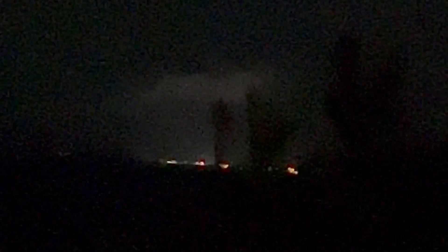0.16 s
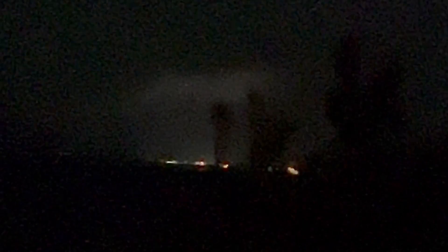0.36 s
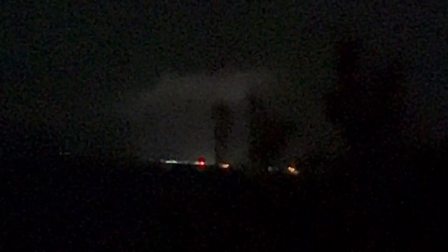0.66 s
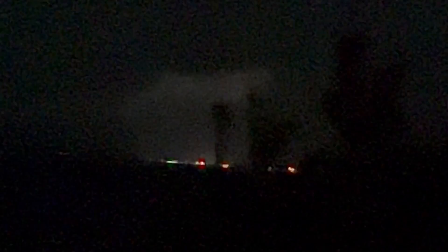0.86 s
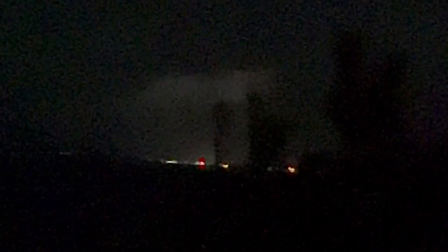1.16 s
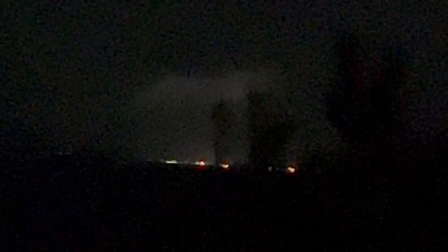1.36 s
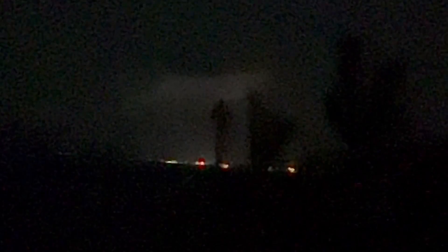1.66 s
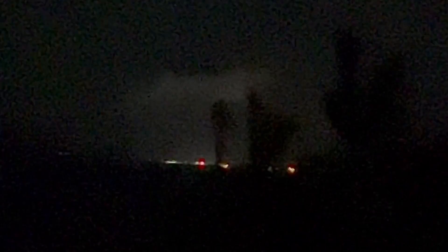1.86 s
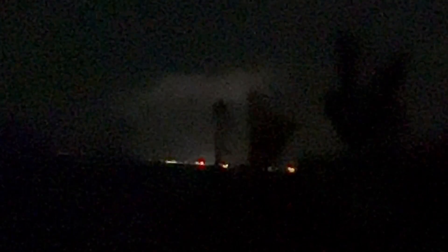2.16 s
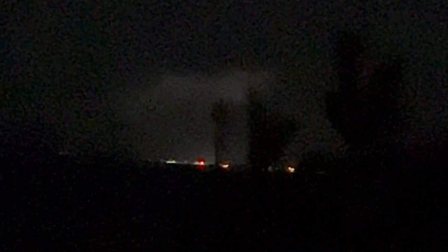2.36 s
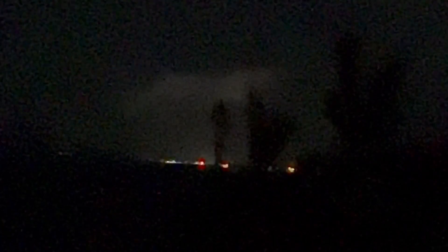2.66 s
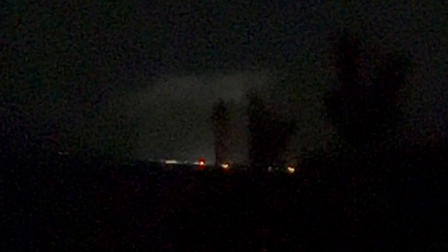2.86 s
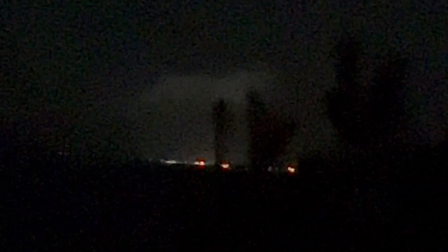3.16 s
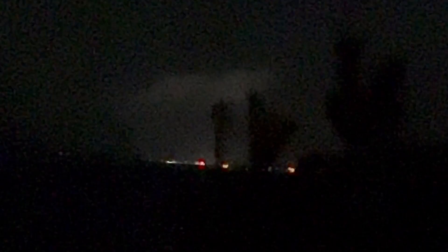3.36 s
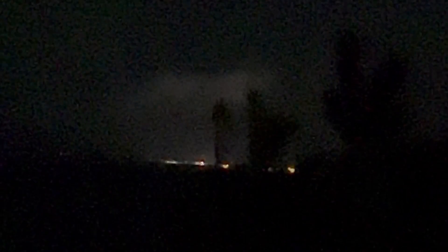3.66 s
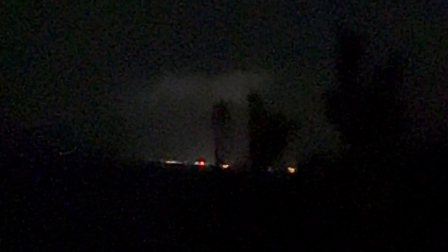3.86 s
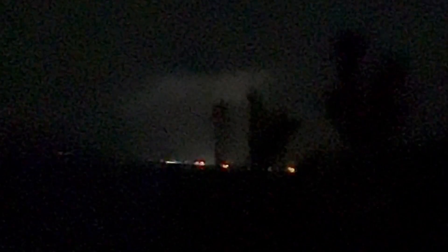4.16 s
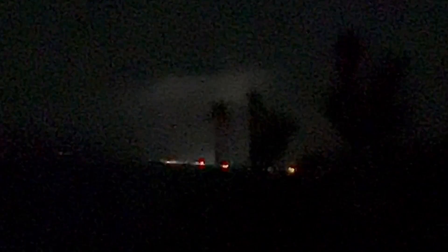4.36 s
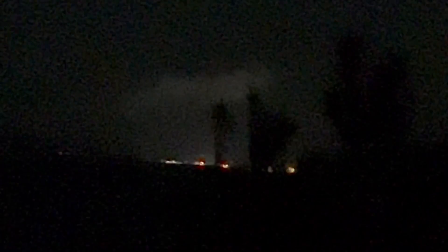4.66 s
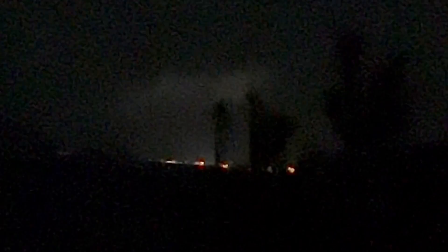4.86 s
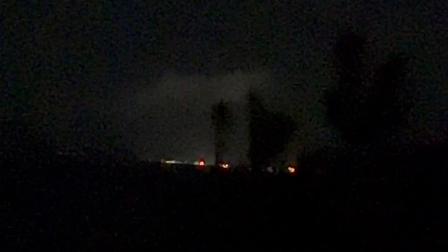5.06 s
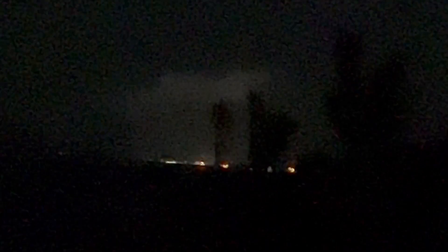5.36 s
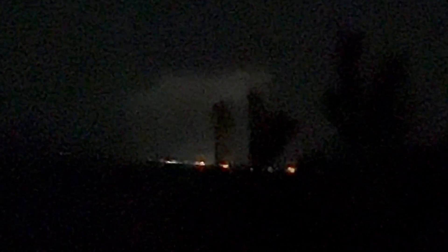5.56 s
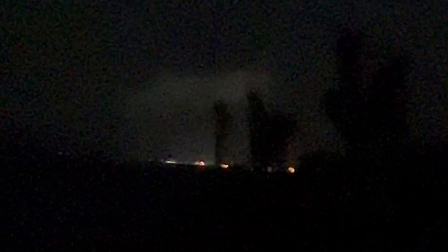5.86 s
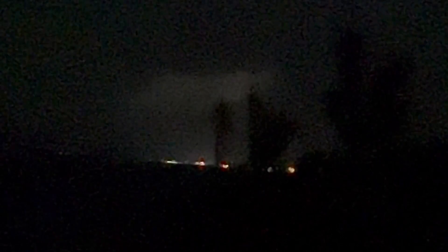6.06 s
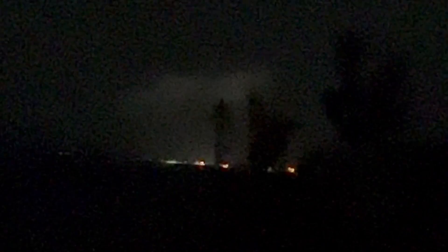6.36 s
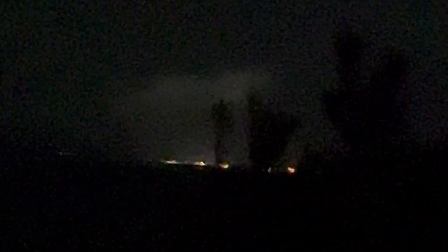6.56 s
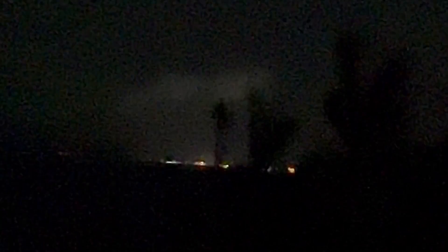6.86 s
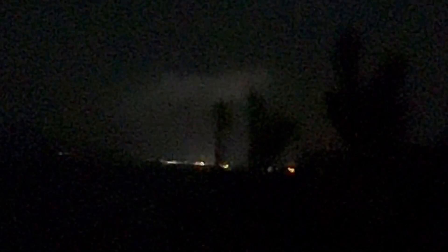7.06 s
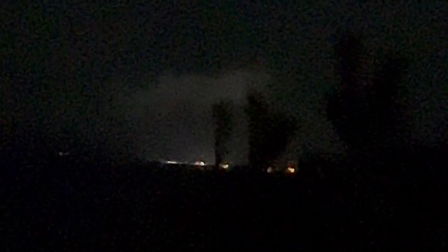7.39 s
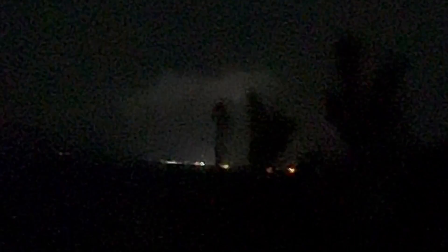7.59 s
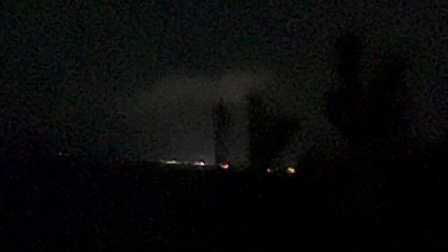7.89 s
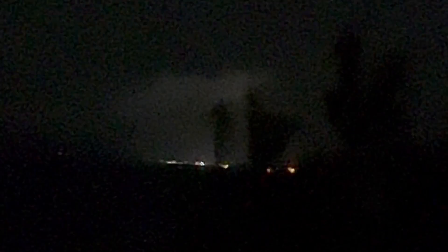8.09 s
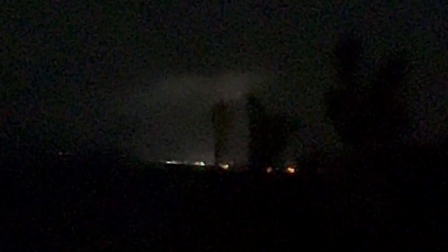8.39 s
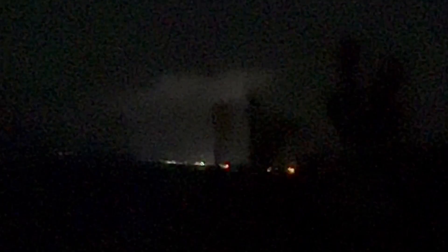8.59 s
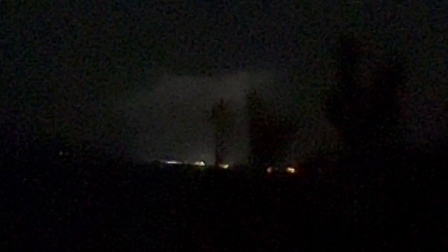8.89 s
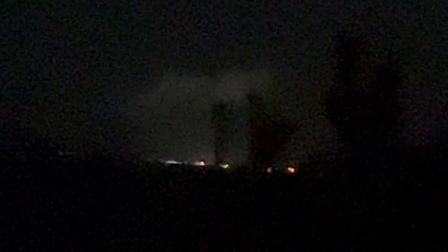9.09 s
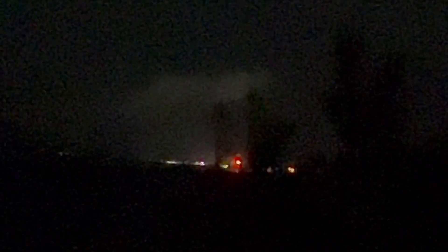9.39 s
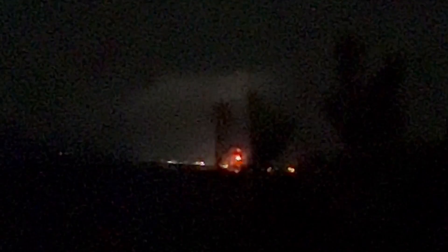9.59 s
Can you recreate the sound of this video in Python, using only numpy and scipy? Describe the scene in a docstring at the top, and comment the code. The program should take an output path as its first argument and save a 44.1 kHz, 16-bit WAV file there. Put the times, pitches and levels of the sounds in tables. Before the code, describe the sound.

A dense cricket chorus shimmers over a dark field while distant fireworks thump softly, one louder blast rolling across the plain late on.

```python
"""A field at night. From the start a cricket chorus near 5.5 kHz, built of short swelling tones, sings over low
far-traffic noise and soft night air; distant fireworks, low pushes with echoes and noise tails, thump early on.
Chirps, sinking trills and a faint high triller stand out as single singers, and a bush cricket ticks in noise.
After some 5.6 s its ticks give way to a buzz, the loudest blast rolls over the plain near 6.9 s,
the buzz stays on only faintly from about 7.6 s, and small thumps follow under the chorus until the end."""
import sys
import numpy as np
from scipy import signal
from scipy.fft import rfft, irfft, next_fast_len
from scipy.io import wavfile
from scipy.ndimage import uniform_filter1d, map_coordinates

SR = 44100
rng = np.random.default_rng(int(sys.argv[2]) if len(sys.argv) > 2 else 0)


def int16_out(signal):
    """Quantize to a 16-bit WAV file."""
    q = np.round(np.clip(np.atleast_2d(signal).T, -1, 1) * 32767)
    wavfile.write(sys.argv[1], SR, q.astype(np.int16))


N = 429093

# Tone colour of far traffic and night air: f/Hz, relative level/dB
AIR_COLOUR = [(18, -12), (32, -29), (48, 2.5), (60, 4), (72, -9), (86, 4), (105, -11.5), (363, -8.5),
              (496, -12), (573, -9), (1550, -19.5), (1910, -20), (2720, -26), (3300, -25), (4200, -26),
              (6400, -19.5), (7200, -32), (8100, -42), (9800, -30), (11300, -34), (12300, -39.5),
              (15800, -53)]
# Loudness of that air over time: t/s, level/dB
AIR_LEVEL = [(0.0, -48.5), (0.51, -49.5), (0.73, -50.5), (2.65, -49.5), (2.85, -50.5), (3.6, -51),
             (4.79, -49), (5.2, -50.5), (6.07, -50), (6.34, -49.5), (7.59, -51), (8.02, -50), (9.73, -50.5)]
# How alike the air is at the two microphone ports: f/Hz, correlation (1 = same)
PORT_LIKENESS = [(60, 1), (300, 0.95), (500, 0.7), (1100, 0.52), (1650, 0.11), (1950, 1), (3900, 0.19),
                 (4500, 0.99), (6200, 1), (6900, 0.3), (7500, 0.29), (9200, 0.87), (9800, 1), (13200, 1),
                 (15800, 1)]

# Firework blasts: t/s, level/dB, brightness f/Hz, rolling tail level/dB against the push
BLASTS = [(0.028, -37.5, 120, -6), (0.139, -36.5, 100, -15), (.345, -40.5, 102, -3),
          (0.528, -39.5, 70, -11), (0.7, -42, 99, -9), (6.888, -18.5, 230, -7.5), (7.275, -45.5, 139, 4),
          (7.987, -41, 90, -5), (8.598, -42, 70, -2), (8.777, -43, 101, -15.5), (9.437, -37.5, 110, -25)]
# Resonances that air and ground leave of a blast: f/Hz, width/Hz, level/dB
BLAST_RESONANCES = [(70.5, 45, 9.5), (126, 60, -3), (237, 120, 0.5), (407, 117, 6)]
# Echoes of the push: delay/s, level/dB
BLAST_ECHOES = [(0.036, -4), (0.083, -9), (0.122, -12), (.16, -17), (.213, -20), (.27, -16.5), (.32, -21)]
# Time the rolling noise takes to fall by 60 dB: f/Hz, t60/s
ROLL_DECAY = [(50, 0.82), (110, 0.93), (280, 0.64), (600, 0.47)]
ECHO_HZ, RUMBLE_LEAD_S = 260, .011  # echoes are duller; the rumble starts just before the push

# Level of the rasping noise, with faint brief flickers late on: t/s, level/dB
RASP_LEVEL = [(0, -72), (5.56, -69), (5.59, -56.5), (7.57, -58), (7.63, -68), (7.85, -85), (8.72, -66),
              (8.95, -77), (9.58, -75), (9.63, -62), (9.68, -80)]
# Tone colour of the rasp: f/Hz, relative level/dB
RASP_COLOUR = [(11500, -54), (12600, -11), (13300, -6), (14100, 2), (14700, -1), (15200, -1), (15800, -0.5)]
# Brief dips in the level of the high noise: t/s, length/s
BUZZ_DIPS = [(5.755, .05), (5.818, .05), (6.135, .05), (6.535, .04), (6.855, .03), (6.935, .035),
             (7.235, .14)]
DIP_DB = -12  # depth of a dip
TICK_START_S, TICK_GAP_S, TICK_COUNT = .055, .07597, 77
TICK_HURRY = .158  # the gap shrinks by this share, mostly late
TICK_RUSH_S, TICK_RUSH_POWER = .02, 40  # the last few ticks come early, by this much at most
TICK_RISE_S, TICK_STOP_S = .022, .008  # a tick swells, then stops short

# Three-stroke chirps of the 6 kHz cricket: t/s, level/dB, how far ahead its faint lead-in stroke comes/s
TRIPLE_CHIRPS = [(.094, -46, 0.057), (0.703, -44, 0.16), (2.058, -47, 0.11), (2.608, -48, .147),
                 (3.84, -47, .147), (4.301, -44, 0.058), (4.904, -46, 0.149), (6.214, -48, .147),
                 (6.765, -44, 0.17), (8.267, -47, 0.12), (8.843, -44, 0.13)]
# Strokes within such a chirp: offset/s, level/dB against the chirp, starting f/Hz
TRIPLE_STROKES = [(-.003, -.5, 6010), (.05, 1.5, 6035), (.103, 2, 6040)]
LEAD_IN_DB, LEAD_IN_HZ = -3, 5960  # level against the chirp; starting pitch
# Long falling strokes, given by their overtone: t/s, overtone level/dB
FALLING_STROKES = [(0.154, -62), (0.213, -62), (0.676, -60.5), (0.817, -60), (0.896, -62), (2.244, -60),
                   (2.388, -60.5), (2.865, -60), (3.021, -60), (4.425, -61), (4.57, -63), (5.01, -65),
                   (5.066, -58), (5.186, -66), (6.44, -60), (6.584, -58), (6.644, -64), (7.136, -59),
                   (7.283, -58.5), (8.519, -55), (8.652, -57), (9.188, -57.5), (9.332, -61)]
# Sinking trills of the lower crickets: t/s, length/s, start f/Hz, end f/Hz, level/dB, strokes/s
SINKING_TRILLS = [(-.05, .55, 4470, 4420, -58, 48.5), (.039, .52, 4610, 4510, -52, 48.5),
                  (.5, .35, 4540, 4500, -62, 48), (.805, .44, 4600, 4550, -52, 47.5),
                  (1.06, .62, 4450, 4415, -57, 47.5), (1.3, .35, 4810, 4740, -59, 53),
                  (2.515, .38, 4810, 4730, -57.5, 53), (3.48, .35, 4810, 4730, -58.5, 53),
                  (4.38, .38, 4810, 4730, -59, 53), (5.345, .38, 4810, 4730, -58.5, 53),
                  (6.33, .38, 4810, 4730, -59, 53), (8.284, .48, 4600, 4490, -52.5, 51),
                  (8.78, .4, 4510, 4500, -63, 51), (9.155, .52, 4600, 4500, -52, 50)]
TRILL_SWELL_S, TRILL_SWELL_DB, TRILL_SCOOP_HZ = .03, 10, 80  # a trill starts soft and flat
# The high triller's bouts: first stroke t/s, end t/s, strokes/s
HIGH_BOUTS = [(.0097, 1.72, 37.98), (1.8938, 9.73, 38.15)]

# Loudness of the farther chorus: t/s, level/dB
FAR_CHORUS_LEVEL = [(0, -39), (.95, -39), (1.1, -41), (1.75, -38), (2.45, -41.5), (3.2, -38), (4.7, -39.5),
                    (6, -39), (7.6, -39), (8.12, -40.5), (8.8, -39.5), (9.36, -39), (9.73, -38.5)]
# The far crowd's blurred spectrum: f/Hz, relative level/dB
CROWD_COLOUR = [(4300, -50), (4700, -31), (4880, -27), (5030, -17), (5250, -9), (5420, -5), (5510, -1.5),
                (5590, -6), (5700, -4), (5780, -18), (5900, -24), (6200, -68)]
# Chirps of the nearest crickets: first stroke t/s, stroke count, strokes/s, level/dB
NEAR_CHIRPS = [(0.024, 3, 39.0, -35.1), (0.232, 7, 39.25, -34.1), (0.434, 6, 36.5, -38.1),
               (0.764, 7, 40.5, -35.3), (1.884, 7, 39.75, -33.9), (2.246, 6, 39.75, -35.5),
               (2.538, 7, 39.0, -37.3), (2.881, 4, 40.25, -33.5), (3.014, 10, 38.5, -35.7),
               (3.444, 7, 38.75, -35.9), (3.729, 10, 39.5, -36.1), (4.188, 6, 38.75, -34.2),
               (4.452, 9, 37.5, -35.7), (4.799, 7, 39.5, -33.6), (5.083, 4, 40.75, -34.1),
               (5.352, 5, 41.0, -36.1), (5.588, 10, 39.0, -38.1), (5.927, 8, 39.5, -35.1),
               (6.222, 7, 39.5, -34.0), (6.548, 7, 39.5, -34.8), (6.836, 3, 37.5, -34.9),
               (7.156, 8, 38.5, -35.6), (7.464, 5, 39.75, -34.4), (7.595, 5, 39.5, -36.4),
               (7.823, 10, 38.5, -36.8), (8.22, 6, 38.75, -34.3), (8.612, 7, 37.5, -36.9),
               (8.813, 3, 36.5, -37.3), (8.994, 3, 36.5, -36.1), (9.203, 4, 37.5, -32.6),
               (9.446, 5, 37.75, -35.0)]
CHIRP_ENDS_DB, STROKE_SCATTER_DB = -0.5, 1.5  # end strokes against the middle; chance spread per stroke
# Sharp single strokes that stand out of the chorus: t/s (shortly before mid-stroke), level/dB
SHARP_STROKES = [(.205, -42), (0.313, -35), (0.761, -36), (0.79, -39), (1.254, -34), (1.57, -42),
                 (1.883, -34), (1.93, -33), (2.245, -32.5), (2.312, -28), (2.617, -34), (2.803, -32.5),
                 (3.088, -43), (3.847, -38), (4.502, -38), (4.541, -43), (4.636, -38), (4.797, -32),
                 (4.821, -34), (4.923, -36), (4.944, -31), (5.742, -34), (6.295, -32.5), (6.547, -32.5),
                 (6.568, -34), (6.601, -37), (6.831, -36), (7.155, -37), (7.205, -33), (7.286, -32),
                 (7.336, -36), (7.444, -42), (8.638, -35), (8.688, -39), (9.198, -34), (9.227, -30),
                 (9.28, -32)]
SHARP_S = .012  # length of such a stroke
CLEARING_S, CLEARING = .02, .9  # background level is lowered by this share so the stroke stands clear

# What leaves scatter of the insects: f/Hz, level/dB
LEAF_SCATTER = [(4000, -22), (6500, -22), (8500, -11), (11500, -15), (15000, -19)]
# Balance of the two ports: f/Hz, left over right level/dB
PORT_BALANCE = [(330, 0), (770, 3), (1170, 7), (1790, 1), (2740, 1), (4190, -0.5)]
# Phase between the two ports: f/Hz, lead of the left/rad
PORT_LEAD = [(0, 0), (400, 0), (1030, 1), (1400, 1.2), (1720, 5.6), (2600, 8.6), (3900, 7.1), (4500, 7.75),
             (5000, 7.68), (5100, 7.8), (5800, 9.4), (6030, 9.68), (6890, 10.3), (7300, 12.5), (8270, 12.6),
             (9700, 15.7), (10350, 15.7), (12200, 18.8), (13000, 19.2), (14500, 21.9), (15800, 23.3)]
TOP_HZ = 15830  # upper band limit


def amp(db):
    """Gain of a level in dB."""
    return 10 ** (np.asarray(db) / 20)


def unit(x):
    """x at rms 1."""
    return x / np.sqrt(np.mean(x ** 2) + 1e-20)


def along(points, hz):
    """Read (Hz, value) points on a log frequency axis."""
    f, v = np.transpose(points)
    return np.interp(np.log(hz + 1), np.log(f + 1), v)


def curve(rows):
    """One value per sample from (s, value) rows."""
    return np.interp(np.arange(N) / SR, *np.transpose(rows))


def wobble(rate, s):
    """A smooth random curve at times s, with rate knots a second."""
    knots = rng.standard_normal(int(N * rate / SR) + 4)
    return map_coordinates(knots, [s * rate], mode="nearest")


def filtered(x, response):
    """Shape x with a complex response of frequency."""
    m = next_fast_len(N + SR // 4, True)
    return irfft(rfft(x, m) * response(np.fft.rfftfreq(m, 1 / SR)), m)[..., :N]


def noise(colour):
    """Random noise with the tone colour of (Hz, dB) points."""
    return filtered(rng.standard_normal(N), lambda hz: amp(along(colour, hz)))


def resonances(modes, f):
    """Causal response at f of summed resonances (Hz, width, dB)."""
    return sum(amp(db) * 1j * f * w / (c * c - f * f + 1j * f * w) for c, w, db in modes)


def strokes(mid_s, db, hz, length, fall, overtone_db, point=0.47, late=1.16):
    """Wing strokes: swelling tones that sink from hz by the share fall, with their octave."""
    step = np.arange(int(length * SR))
    u = step / len(step)
    sinking = u - fall * u ** (late + 1) / (late + 1)  # a larger late keeps the fall for the end
    turns = np.reshape(hz, (-1, 1)) * length * sinking + rng.random((len(mid_s), 1))
    tone = np.sin(2 * np.pi * turns) + amp(overtone_db) * np.sin(4 * np.pi * turns)
    swell = np.sin(np.pi * u) ** point  # a larger point makes a narrower swell
    rows = np.sqrt(2) * np.reshape(amp(db), (-1, 1)) * swell * tone
    # a spare second ahead leaves room for strokes that begin before zero
    at = np.round((np.reshape(mid_s, (-1, 1)) - length / 2 + 1) * SR).astype(int) + step
    return np.bincount(at.ravel(), rows.ravel(), N + 3 * SR)[SR:SR + N]


def air():
    """Far traffic and night air: stereo noise, only partly alike at the two ports."""
    def mid_side(hz):
        turn = np.arccos(np.clip(along(PORT_LIKENESS, hz), -1, 1)) / 2
        return amp(along(AIR_COLOUR, hz)) * [np.cos(turn), np.sin(turn)]

    mid, side = filtered(rng.standard_normal((2, N)), mid_side)
    return amp(curve(AIR_LEVEL)) * unit(np.array([mid + side, mid - side]))


def fireworks():
    """Each blast is one low push with a few echoes and a rolling tail; distance dulls it."""
    out, t = np.zeros(N + SR), np.arange(SR) / SR
    hz = np.fft.rfftfreq(SR, 1 / SR)
    echoes = sum(amp(e) * np.exp(-2j * np.pi * hz * lag) for lag, e in BLAST_ECHOES)
    paths = 1 - echoes / (1 + (hz / ECHO_HZ) ** 4)
    delay = np.exp(-2j * np.pi * hz * (RUMBLE_LEAD_S + 0.0018))
    # each band of the rolling noise dies at its own pace
    bands, frames, z = signal.stft(rng.standard_normal((len(BLASTS), SR)), SR, nperseg=1024)
    decay = amp(-60 * frames / along(ROLL_DECAY, bands)[:, None])
    tails = signal.istft(z * decay, SR, nperseg=1024)[1][:, :SR]
    for (s, db, bright_hz, tail_db), tail in zip(BLASTS, tails):
        dulling = 1 + 1j * hz / bright_hz
        far = resonances(BLAST_RESONANCES, hz) / dulling ** 3 / (1 + 1j * hz / 620) ** 3
        push = irfft(far * paths * delay, SR)
        tail = irfft(rfft(tail) * far * dulling ** 2, SR)  # the tail stays brighter
        tail = tail * (1 - np.exp(-(t / 0.01) ** 2))  # soft onset
        blast = push / abs(push).max() + amp(tail_db) * tail / abs(tail).max()
        out[round((s - RUMBLE_LEAD_S) * SR):][:SR] += amp(db) * blast
    return out[:N]


def bush_cricket():
    """Rasping noise, gated into short ticks, then into a buzz."""
    now = np.arange(N) / SR
    k = np.arange(TICK_COUNT)
    s = TICK_START_S + TICK_GAP_S * k * (1 - TICK_HURRY * (k / TICK_COUNT) ** 2 / 3)
    s = s - TICK_RUSH_S * (k / k[-1]) ** TICK_RUSH_POWER
    ticks = np.zeros(N)
    ticks[np.round(s * SR).astype(int)] = amp(rng.normal(-52.0, 1.1, len(s)))
    t = np.arange(-SR // 20, SR // 20) / SR
    tick_shape = np.interp(t, [-TICK_RISE_S, -TICK_RISE_S / 3, 0, TICK_STOP_S], [0, .8, 1, 0])
    ticks = signal.fftconvolve(ticks, tick_shape, "same")
    dipped = sum(1. * (now > start) * (now < start + length) for start, length in BUZZ_DIPS)
    dipped = uniform_filter1d(dipped, size=200)  # soft edges
    buzz = amp(curve(RASP_LEVEL) + DIP_DB * dipped)
    teeth = unit(amp(3.2 * wobble(110, now)))  # the file catches unevenly
    rasp = filtered(rng.standard_normal(N), lambda hz: amp(along(RASP_COLOUR, hz) - 60 * (hz < 11500)))
    return (ticks + buzz) * teeth * unit(rasp)


def triple_chirper():
    """The 6 kHz cricket: three strokes to a chirp, each chirp after a faint lead-in stroke."""
    rows = [(t + dt, level + step, hz) for t, level, lead in TRIPLE_CHIRPS for dt, step, hz in TRIPLE_STROKES]
    s, db, hz = np.transpose(rows)
    chirps = strokes(s, db, hz, 0.039, .034, -26, point=0.45, late=4)
    s, db, lead = np.transpose(TRIPLE_CHIRPS)
    lead_in_hz = np.full(len(s), LEAD_IN_HZ)
    return chirps + strokes(s - lead, db + LEAD_IN_DB, lead_in_hz, .028, .025, -30, late=2.5)


def falling_singer():
    """Long falling strokes, heard mostly by the overtone above the chorus band."""
    s, db = np.transpose(FALLING_STROKES)
    overtone_db = -18.0
    return strokes(s, db - overtone_db, 5480, .046, .042, overtone_db, point=.9, late=.8)


def sinking_trills():
    """Lower crickets: quick rows of strokes that swell in, then sink in pitch and fade."""
    out = 0
    for start, length, start_hz, end_hz, db, rate in SINKING_TRILLS:
        u = np.arange(0, length, 1 / rate) / length
        soft = np.exp(-(u * length / TRILL_SWELL_S) ** 2)
        fade_db = db - 4 * u - 7 * u ** 3 - TRILL_SWELL_DB * soft + rng.normal(0, 1.5, len(u))
        s = start + u * length + rng.normal(.01, .0005, len(u))
        hz = end_hz + (start_hz - end_hz) * (1 - u) ** 1.3 - TRILL_SCOOP_HZ * soft
        hz = hz + rng.normal(0, 10, len(u))
        out = out + strokes(s, fade_db, hz, 0.019, 0.012, -38, point=.6)
    return out


def high_triller():
    """Evenly paced faint strokes that start at 9.1 kHz."""
    s = np.concatenate([np.arange(start, end, 1 / rate) for start, end, rate in HIGH_BOUTS])
    return strokes(s, rng.normal(-68.5, 1.2, len(s)), 9110, 0.02, 0.086, -60)


def far_chorus(count=2):
    """Singers out of step, each at its own pace and pitch, over the crowd's blurred noise."""
    singers = 0
    for pace, pitch in rng.standard_normal((count, 2)):
        s = np.arange(0, N / SR, 1 / (38.8 + .7 * pace))
        s = s + rng.normal(.01, .001, len(s))
        phrase_db = 2.2 * wobble(2.79, s) + rng.normal(0, 1.6, len(s))
        singers = singers + strokes(s, phrase_db, 5700 + 70 * pitch, .022, 0.0772, -28.5)
    blend = unit(singers) + 0.81 * unit(noise(CROWD_COLOUR))
    return amp(curve(FAR_CHORUS_LEVEL)) * unit(blend)


def near_crickets():
    """The nearest crickets chirp in short runs of strokes, a touch softer at both ends."""
    runs = []
    for s, count, rate, db in NEAR_CHIRPS:
        for k in range(round(count)):
            place = 2 * k / (round(count) - 1) - 1  # -1 at the first stroke, 1 at the last
            runs.append((s + k / rate, db + CHIRP_ENDS_DB * place ** 2))
    s, db = np.transpose(runs)
    chance = rng.standard_normal((len(s), 2))
    hz = 5575 + 20 * chance[:, 1]
    return strokes(s, db + STROKE_SCATTER_DB * chance[:, 0], hz, .02, 0.034, -32.0)


def chorus():
    """Far and near crickets, their level lowered briefly so that each sharp single stroke stands clear."""
    s, db = np.transpose(SHARP_STROKES)
    starts = np.bincount(np.round((s - SHARP_S / 2) * SR).astype(int), minlength=N)
    window = np.hanning(int(CLEARING_S * SR))
    background_gain = 1 - CLEARING * signal.fftconvolve(starts, window, "same")
    sharp = strokes(s + SHARP_S / 8, db, np.full(len(s), 5610), SHARP_S, 0.041, -35, point=0.48)
    return background_gain * (far_chorus() + near_crickets()) + sharp


def leaves(insects):
    """Leaves scatter the insects to each side: a separate dying noise tail for either port."""
    t = np.arange(SR // 5) / SR
    tails = rng.standard_normal((2, SR // 5)) * amp(-60 * t / .2)  # 60 dB down in 0.2 s
    scatter = signal.oaconvolve(insects[None], tails / np.linalg.norm(tails[0]), axes=1)[:, :N]
    return filtered(scatter, lambda hz: amp(along(LEAF_SCATTER, hz)))


def scene():
    """Air, blasts and insects, with the insects' scatter from the leaves."""
    soloists = triple_chirper() + falling_singer() + sinking_trills() + high_triller()
    insects = chorus() + soloists + bush_cricket()
    return insects + leaves(insects) + fireworks() + air()


def record(dry):
    """Two ports with their own balance and phase, a bass cut, nothing above the band limit."""
    side = np.array([[.5], [-.5]])  # left and right take half of each difference
    low_hz = 43

    def ports(hz):
        balance = amp(side * along(PORT_BALANCE, hz))
        phase = np.exp(1j * side * np.interp(hz, *np.transpose(PORT_LEAD)))
        bass_cut = (hz * hz / (hz * hz - low_hz ** 2 - 1.3j * hz * low_hz)) ** 2
        return balance * phase * bass_cut * (hz < TOP_HZ)

    return filtered(dry, ports)


dry = scene()
out = record(dry)
int16_out(out)
```